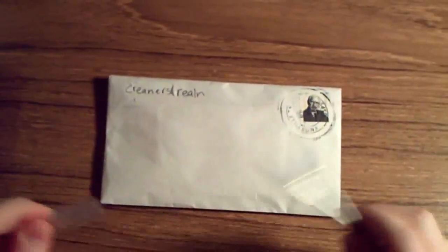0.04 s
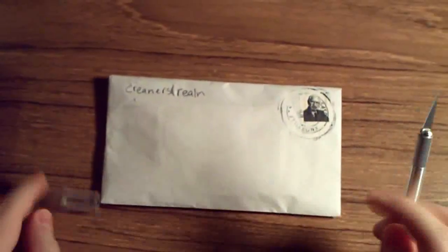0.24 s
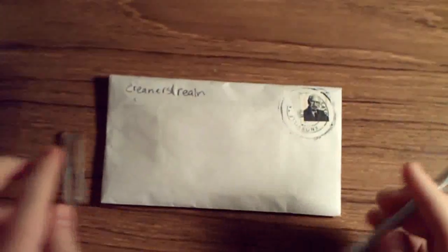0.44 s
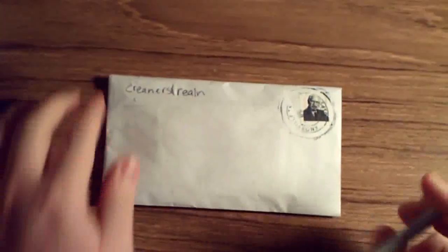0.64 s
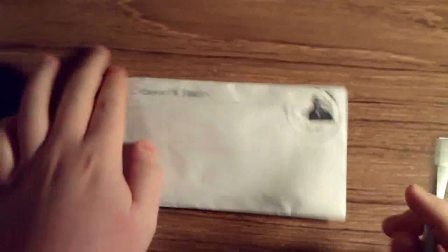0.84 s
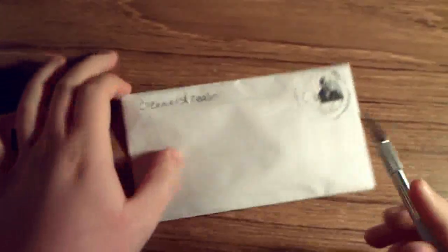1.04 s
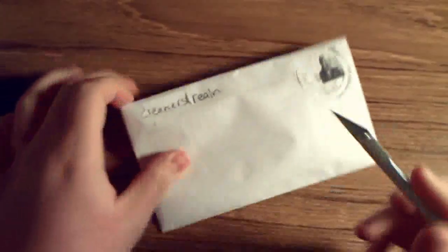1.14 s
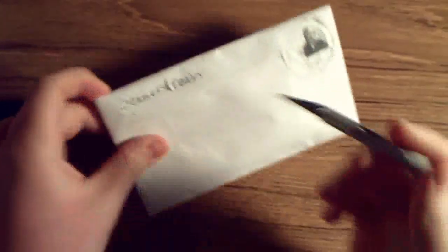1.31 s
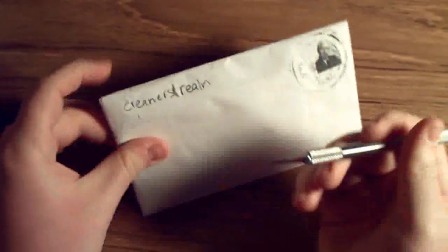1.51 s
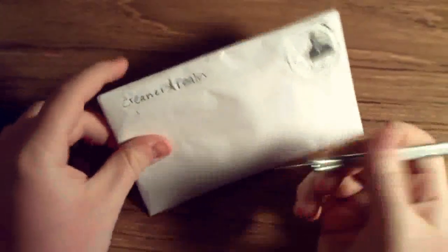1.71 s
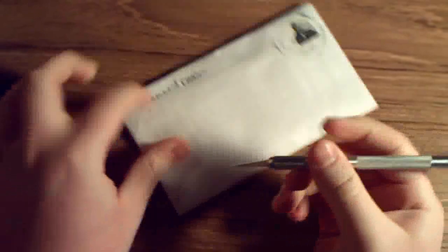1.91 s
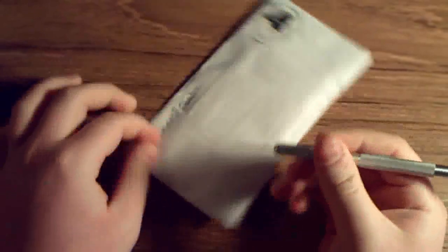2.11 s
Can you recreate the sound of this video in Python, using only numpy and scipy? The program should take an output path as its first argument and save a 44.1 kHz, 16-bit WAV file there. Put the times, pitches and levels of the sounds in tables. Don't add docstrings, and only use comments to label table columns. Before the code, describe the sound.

Paper envelope handling, crisp and crackly, in the second half; first near-quiet, then a light plastic cap clatters on wood and is knocked again as the hand arrives. Close, dry, faint room hum.

```python
import sys
import numpy as np
from scipy import signal
from scipy.fft import rfft, irfft, next_fast_len
from scipy.io import wavfile

SR = 44100
rng = np.random.default_rng(int(sys.argv[2]) if len(sys.argv) > 2 else 0)


def to_wav(s):
    ch = np.atleast_2d(s).T
    pcm = np.round(np.clip(ch, -1, 1) * 32767)
    wavfile.write(sys.argv[1], SR, pcm.astype(np.int16))


def magnitude_from_level(level_db):
    exponent = np.asarray(level_db, float) / 20
    return 10 ** exponent


N = 94815


def rms_one(x):
    return x / np.sqrt(np.mean(x ** 2) + 1e-20)


def band_pass(x, low_hz, high_hz):
    return signal.sosfilt(signal.butter(2, [low_hz, high_hz], "band", fs=SR, output="sos"), x)


def effort(rows):
    s, db = np.transpose(rows)
    return magnitude_from_level(np.interp(np.arange(N) / SR, s, db))


def drift(rate_hz):
    r = np.exp(-80 * np.pi * rate_hz / SR)
    noise = rng.standard_normal(N // 40 + 2002)
    slow = signal.lfilter([1], [1, -2 * r, r * r], noise)[2000:]
    return np.interp(np.arange(N) / 40, np.arange(len(slow)), rms_one(slow))


def clicks_at(seconds, heights):
    clicks = np.zeros(N)
    clicks[(np.asarray(seconds) * SR).astype(int)] = heights
    return clicks


def dying(clicks, t60_s):
    return signal.lfilter([1], [1, -magnitude_from_level(-60 / (t60_s * SR))], clicks + 1e-18)


def ring(clicks, hz, t60_s):
    r = magnitude_from_level(-60 / (max(t60_s, 0.002) * SR))
    w = 2 * np.pi * hz / SR
    return signal.lfilter([0, np.sin(w)], [1, -2 * r * np.cos(w), r * r], clicks + 1e-18)


def ring_all(clicks, modes):
    return rms_one(sum(magnitude_from_level(db) * ring(clicks, hz, t60_s) for hz, db, t60_s in modes))


def grains(per_s, spread_db, shape):
    size = magnitude_from_level(spread_db * np.minimum(rng.exponential(1, shape), 4))
    size = size * rng.choice([-1, 1], shape)
    return size * (rng.random(shape) < per_s / SR)


def coloured(source, spectrum, patchy_db, rate_hz):
    hz, db = np.transpose(spectrum)
    edges = 20 * 2 ** np.arange(0, 9.8, 1 / 3)
    out = 0
    for k, (low, high) in enumerate(zip(edges, edges[1:])):
        mid = np.sqrt(low * high)
        if hz[0] * 0.9 < mid < hz[-1] * 1.1:
            level_db = np.interp(np.log(mid), np.log(hz), db)
            out = out + band_pass(source[k % 2], low, high) * magnitude_from_level(level_db + patchy_db * drift(rate_hz))
    return rms_one(out)


def struck(rows, column, modes, trim_db, chatter_db=-14, sign=-1):
    rows = np.array(rows)
    out = 0
    for k, (hz, db, t60_s) in enumerate(modes):
        uneven_db = 3 * rng.uniform(-1.2, 1, len(rows))
        clicks = clicks_at(rows[:, 0], magnitude_from_level(rows[:, column] + trim_db + db + uneven_db))
        chatter = magnitude_from_level(chatter_db) * grains(900, 2.84, N)
        out = out + sign ** k * ring(clicks + dying(clicks, 0.051) * chatter, hz, t60_s)
    return out


# frequency in Hz, level in dB per Hz.
AIR_SPECTRUM = [(12, -34), (20, 3.5), (122, -12.5), (196, -11.5), (315, -19.5), (352, -16.5), (725, -22),
                (8880, -39), (15500, -63)]
# frequency in Hz, level in dB rms.
HUM_TONES = [(58, -67), (120, -65.5)]


def air():
    t = np.arange(N) / SR
    hum = 0
    for hz, db in HUM_TONES:
        hum = hum + magnitude_from_level(db + 2 + drift(2.7)) * np.sin(2 * np.pi * hz * t + 0.83 * drift(4.6))
    noise = coloured(rng.standard_normal((2, N)), AIR_SPECTRUM, patchy_db=2.4, rate_hz=13.0)
    return magnitude_from_level(-58.5) * noise + hum


def room(x):
    t60_s, wall_cut_hz = 0.24, 7100
    size = next_fast_len(N + SR)
    hz = np.arange(size // 2 + 1) * SR / size
    total = 0
    for k, lag_s in enumerate(rng.uniform(0.006, 0.03, size=10)):
        loss = magnitude_from_level(-60 * lag_s / t60_s * (1.5 + hz / wall_cut_hz))
        loop = loss * np.exp(-2j * np.pi * hz * lag_s)
        total = total + (-1) ** k * loop / (1 - loop)
    return irfft(rfft(x, size) * total, size)[:N]


# start in seconds, level in dB, frequency in Hz, t60 in seconds.
TABLE_BUMPS = [
    (0.912, -42.5, 39.7, 0.096),
    (1.879, -42.5, 165, 0.11),
]


def bumps():
    out = 0
    for s, db, hz, t60_s in TABLE_BUMPS:
        out = out + ring(clicks_at([s], -magnitude_from_level(db)), hz, t60_s)
    return signal.sosfilt(signal.butter(2, 300, fs=SR, output="sos"), out)


def brush():
    middle_s, width_s, level_db = 1.765, 0.035, -50.5
    t = np.arange(N) / SR
    hiss = sum(rms_one(ring(grains(6000, 3.0, N), hz, 0.0079)) for hz in (4350, 4940, 6000))
    return magnitude_from_level(level_db) * np.exp(-0.5 * ((t - middle_s) / width_s) ** 2) * rms_one(hiss)


# time in seconds, level in dB.
SLIDE_EFFORT = [(0, -67), (.09, -80.5), (.8, -80.5), (.88, -57.5), (1.05, -62), (1.14, -55), (1.18, -66),
                (1.24, -50), (1.33, -65.5), (1.46, -64), (1.51, -66.5), (1.57, -73), (1.68, -60),
                (1.775, -47.5), (1.9, -58), (1.96, -61), (2.04, -70.5), (2.14, -55)]
# time in seconds, level in dB.
FLEX_EFFORT = [(.76, -75), (.86, -57.5), (1.0, -61), (1.1, -64), (1.15, -60), (1.32, -64.5), (1.45, -66),
               (1.56, -58), (1.72, -59), (1.8, -49.5), (1.9, -53.5), (2.02, -62.5), (2.15, -61.5)]
# frequency in Hz, level in dB per Hz.
RUB_SPECTRUM = [(1600, -33), (2700, -3), (4300, -1.5), (5100, -9.5), (6100, -0.5), (9000, -10),
                (15000, -62)]
# frequency in Hz, level in dB per Hz.
SHEET_SPECTRUM = [(250, -13), (660, -8.5), (900, -5), (1400, -3.5), (1800, -31), (2600, -1.5)]


def rustle():
    flutter_db = 1.5
    rub = coloured(grains(12000, 4, (2, N)), RUB_SPECTRUM, patchy_db=2.46, rate_hz=23.0)
    drag = grains(2500, 4.8, (2, N))
    pocket = magnitude_from_level(-5) * rms_one(ring(drag[0] - drag[1], hz=1418.6, t60_s=0.075))
    sheet = coloured(drag, SHEET_SPECTRUM, patchy_db=2.3, rate_hz=11.4) + pocket
    slide = magnitude_from_level(flutter_db * drift(45.0)) * effort(SLIDE_EFFORT) * rub
    return slide + magnitude_from_level(flutter_db * drift(31.0)) * effort(FLEX_EFFORT) * sheet


# start in seconds, peak in dB, pitch in Hz, length in seconds.
CREASES = [(.848, -36, 1300, 0.008), (.8495, -38, 2700, .006), (0.86, -40, 6400, 0.012),
           (0.863, -42, 1300, .015), (0.873, -37, 7000, .006), (.879, -24, 3350, 0.0045),
           (.8795, -28.5, 6600, .004), (.880, -31, 980, 0.0069), (0.893, -33, 1510, 0.0096),
           (0.8942, -38, 3000, 0.011), (1.031, -40, 2900, .015), (1.137, -39, 1440, 0.032),
           (1.212, -39.5, 2170, 0.031), (1.282, -21.5, 3170, 0.014), (1.2824, -27.5, 1340, 0.013),
           (1.286, -30, 2300, .012), (1.287, -26, 5600, .006), (1.331, -44, 1000, .01),
           (1.365, -36, 3030, 0.0092), (1.366, -45, 1100, .006), (1.391, -38, 1000, 0.019),
           (1.4014, -35, 1190, 0.013), (1.402, -41, 2950, .006), (1.488, -32, 2970, 0.011),
           (1.594, -41, 2030, 0.049), (1.6979, -28.5, 2040, 0.0092), (1.699, -26, 2950, .008),
           (1.70, -35, 900, 0.011), (1.787, -38, 1290, .015), (1.8272, -21, 3150, 0.0094),
           (1.830, -26, 2100, 0.011), (1.842, -29.5, 2210, 0.013), (1.855, -32, 2180, 0.007),
           (1.868, -33, 3000, 0.011), (1.872, -34, 1000, 0.018), (1.886, -28, 2640, 0.01),
           (1.895, -36, 2300, .01), (1.93, -33, 3380, 0.003), (1.9388, -26, 3200, 0.011),
           (1.939, -28.5, 900, 0.012), (1.9433, -28, 2230, .008), (1.9436, -25, 6100, .004),
           (1.955, -33, 5800, .008), (2.048, -46, 1100, .008)]


def snaps():
    level_db, broad_db, cycles = -5, 11, 11.7
    size = SR // 6
    out = np.zeros(N + SR)
    for s, db, hz, length_s in CREASES:
        clicks = 0.4 * grains(2600, 1.2, size)
        clicks[0] = 1
        clicks = clicks * magnitude_from_level(-60 * np.arange(size) / SR / (2.4 * max(length_s, 0.003)))
        upper_hz = hz * (1.47 + 0.033 * rng.uniform(-1, 1))
        tone = ring(clicks, hz, cycles / hz) - 0.36 * ring(clicks, upper_hz, cycles / hz)
        broad = band_pass(clicks, max(0.5 * hz, 600), min(5.0 * hz, 10000))
        i = int(s * SR)
        out[i:i + size] += magnitude_from_level(db + level_db) * (tone + magnitude_from_level(broad_db) * broad)
    return out[:N]


# start in seconds, level in dB, t60 in seconds.
ROLL_STARTS = [
    (0.301, -44.5, 0.73),
    (0.929, -47.5, 0.54),
]
# frequency in Hz, level in dB, t60 in seconds.
BARREL_MODES = [(2180, -11.5, 0.021), (2770, -2.5, 0.012), (2824, -5, 0.018), (3160, -5.5, 0.01),
                (3850, -4.5, 0.0052), (4630, -16.5, 0.017)]
# frequency in Hz, level in dB, t60 in seconds.
RIM_MODES = [(5530, -11, 0.013), (6460, 3.5, 0.0087), (6505, -1, 0.024), (7750, -3, 0.016),
             (8050, -4, 0.017), (8172, 2, 0.025), (9770, -15, 0.017), (10500, -27, 0.018),
             (11500, -28, 0.02), (13900, -29, .045)]


def roll():
    t = np.arange(N) / SR
    fade = 0
    for s, db, t60_s in ROLL_STARTS:
        fade = fade + (t > s) * magnitude_from_level(db - 60 * np.maximum(t - s, 0) / t60_s)
    ticks = grains(1800, 2.5, N)
    wood = rms_one(band_pass(ticks, 700, 2800)) + 0.79 * rms_one(ring(ticks, 1386, 0.015))
    shell = magnitude_from_level(-12) * ring_all(ticks, BARREL_MODES) + magnitude_from_level(-10) * ring_all(ticks, RIM_MODES)
    return fade * rms_one(wood + shell)


# start in seconds, barrel in dB, table knock in dB, rim ring in dB.
DROP_TOUCHES = [(.002, -51, -58, -59), (.02, -49, -60, -61), (.045, -59, -61, -65),
                (0.2647, -10.5, -22.5, -26), (0.2684, -14.5, -28.5, -23.5), (.2787, -12.5, -25, -24.5),
                (.289, -34, -39, -33.5), (.2995, -53, -50, -37.5), (.307, -42, -44, -42),
                (.315, -45, -44, -46), (0.3229, -23, -32, -36), (.3318, -27, -36, -32),
                (0.3397, -23, -42, -39), (.3540, -44, -27, -39), (0.3674, -23, -37, -35),
                (0.3797, -34, -27.5, -39), (0.3971, -28.5, -37, -44), (0.3992, -29, -33.5, -46),
                (.4138, -34, -32.5, -43), (0.4231, -27, -37, -49), (.4280, -31, -35, -65),
                (.4370, -35, -40.5, -51), (.4455, -41, -43, -60), (.4520, -38, -42, -56),
                (.458, -44, -41, -64), (0.473, -40, -42, -66), (.4790, -32, -45, -49.5),
                (.4850, -40, -39.5, -66), (.491, -40, -44, -66), (.497, -48, -43, -68)]
# start in seconds, barrel in dB, table knock in dB, rim ring in dB.
KNOCK_TOUCHES = [(0.9253, -21.5, -26, -35), (.928, -32, -35.5, -44), (0.9336, -32, -39, -59),
                 (.938, -38, -46, -58), (0.942, -45, -45, -44), (0.9492, -50, -32, -58),
                 (0.9548, -35, -39, -46), (.958, -45, -48, -62), (0.964, -53, -33, -67),
                 (0.9730, -43, -33.5, -40), (.978, -53, -39, -62), (0.985, -42, -36, -62),
                 (.990, -50, -42, -66), (0.995, -50, -44, -66), (0.9987, -34, -43, -57),
                 (1.012, -44, -44, -66)]
TOUCHES = np.array(DROP_TOUCHES + KNOCK_TOUCHES)
# frequency in Hz, level in dB, t60 in seconds.
TABLE_MODES = [(672, -15.5, 0.018), (876, -9, 0.009), (1190, -2, 0.0077), (1440, -9, 0.021),
               (1810, -8, 0.0078)]


def table_knock():
    knock = struck(TOUCHES, column=2, modes=TABLE_MODES, trim_db=1.5, chatter_db=-19, sign=0.96)
    taps = clicks_at(TOUCHES[:, 0], -magnitude_from_level(TOUCHES[:, 2] - 6))
    knock = knock + ring(taps, 1280, 0.0017)
    return signal.sosfilt(signal.butter(2, 393, "high", fs=SR, output="sos"), knock)


# start in seconds, level in dB.
LANDING_TOUCHES = [
    (.2198, -29.5),
    (.2265, -34),
    (0.23, -42.5),
]
# frequency in Hz, level in dB, t60 in seconds.
SET_DOWN_MODES = [(165, -12, 0.036), (420, -3.5, 0.012), (780, -1, 0.01), (1050, -2.5, 0.012),
                  (3410, -1, 0.0097), (3700, -4, 0.012), (4210, -11, 0.014), (7260, -9.5, 0.02),
                  (8180, -5, 0.022), (13900, -30, .02)]


def crack():
    landing = np.array(LANDING_TOUCHES)
    hits = clicks_at(TOUCHES[:, 0], magnitude_from_level(TOUCHES[:, 3] + 1.5))
    hits = hits + clicks_at(landing[:, 0], magnitude_from_level(landing[:, 1] - 6))
    return band_pass(dying(hits, 0.026) * rng.standard_normal(N), 2400, 9000)


def cap():
    contact = crack() + table_knock()
    barrel = struck(TOUCHES, column=1, modes=BARREL_MODES, trim_db=-7)
    rim = struck(TOUCHES, column=3, modes=RIM_MODES, trim_db=-3.5)
    set_down = struck(LANDING_TOUCHES, column=1, modes=SET_DOWN_MODES, trim_db=-0.5)
    return contact + barrel + rim + set_down


def scene():
    near = cap() + band_pass(snaps(), 393, 7000) + rustle() + brush() + roll()
    return (near + magnitude_from_level(-15) * room(near) + bumps() + air())[None]


def top_cut(x):
    return signal.sosfilt(signal.butter(12, 15810, fs=SR, output="sos"), x)


def record(dry):
    mix = signal.sosfilt(signal.cheby2(10, 60, 15700, fs=SR, output="sos"), dry)
    return top_cut(mix)


dry = scene()
out = record(dry)
to_wav(out)
```